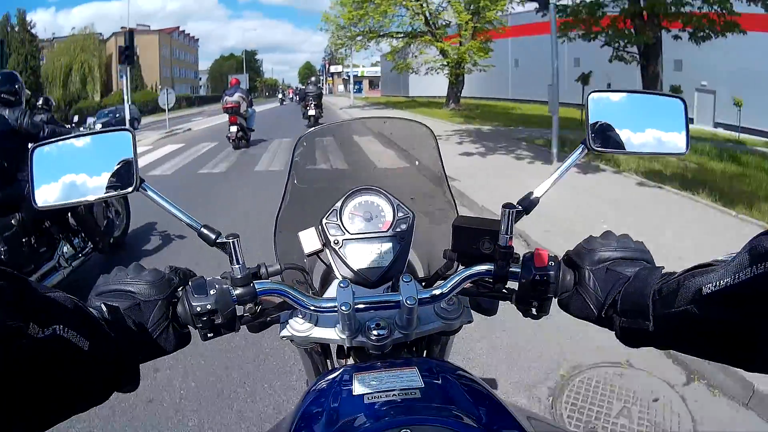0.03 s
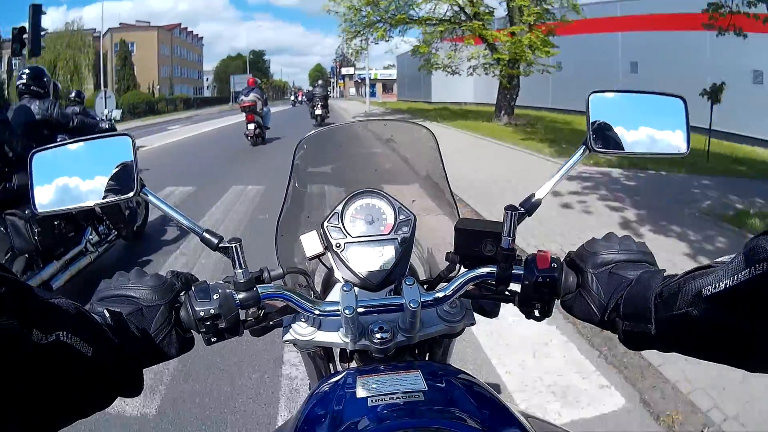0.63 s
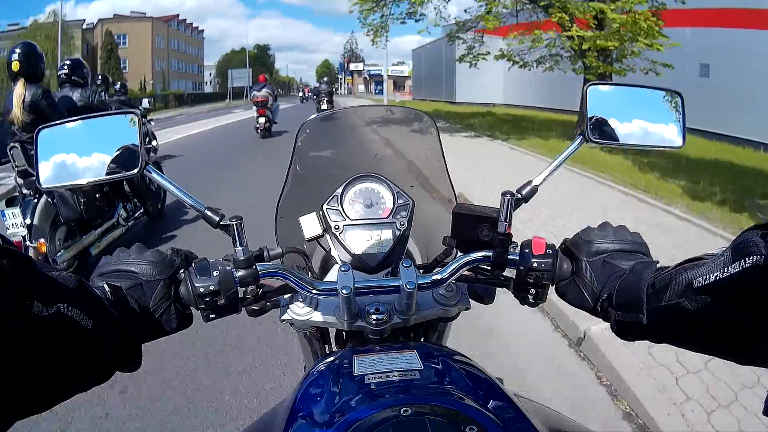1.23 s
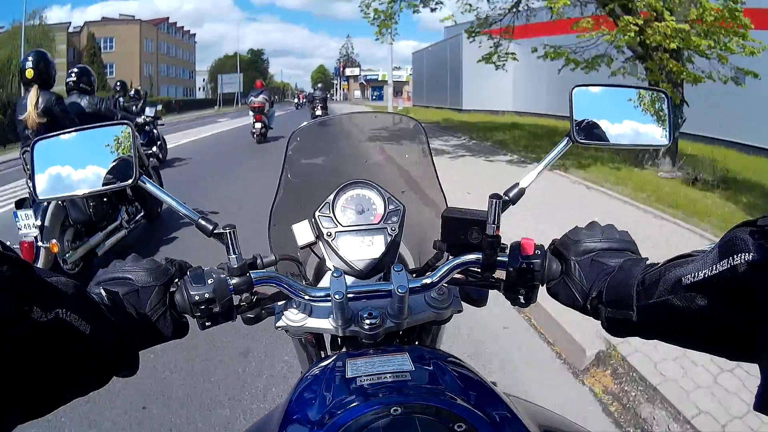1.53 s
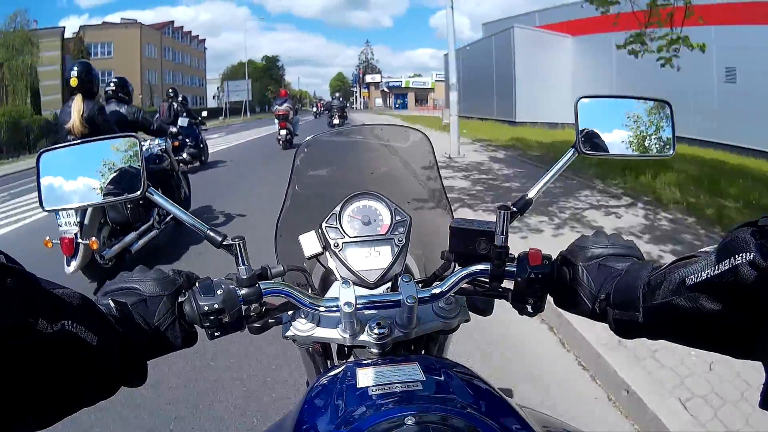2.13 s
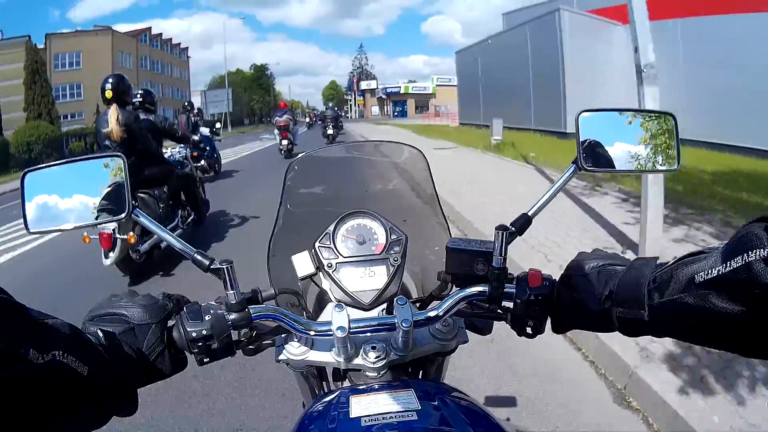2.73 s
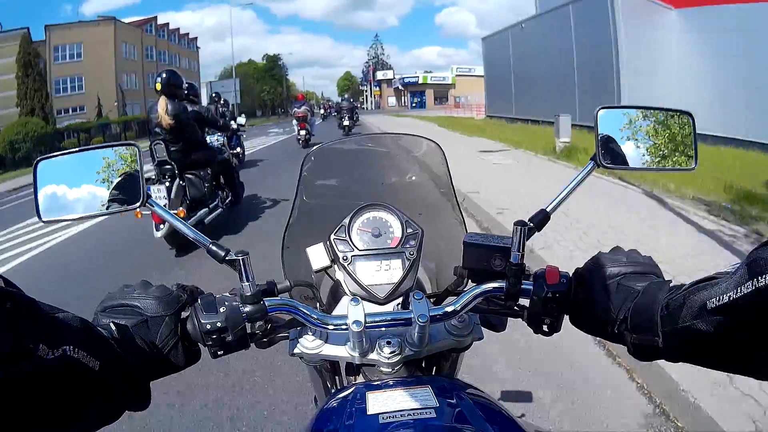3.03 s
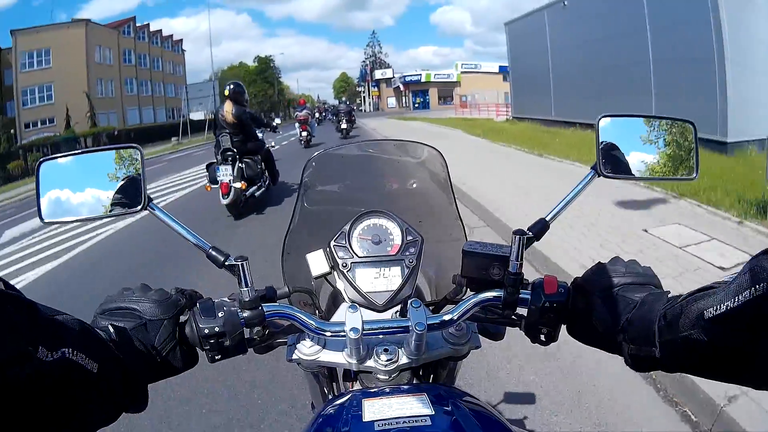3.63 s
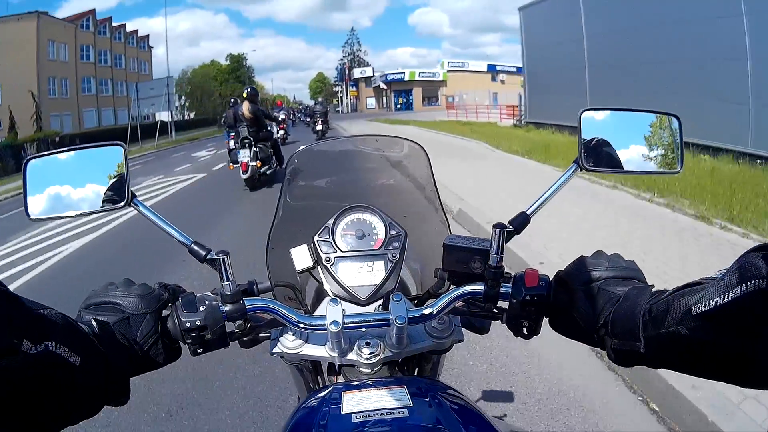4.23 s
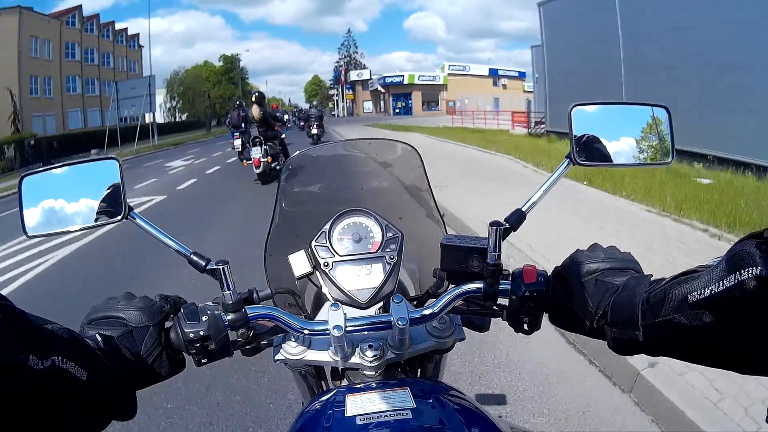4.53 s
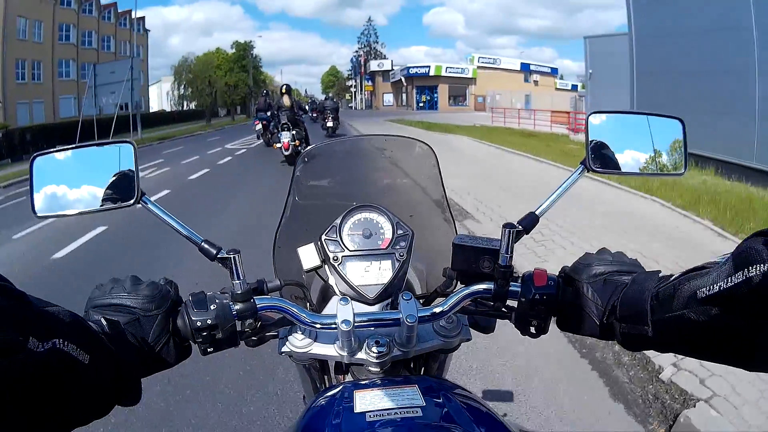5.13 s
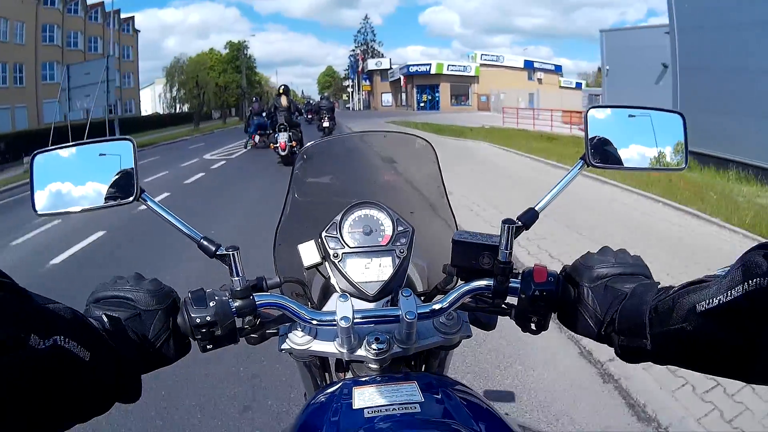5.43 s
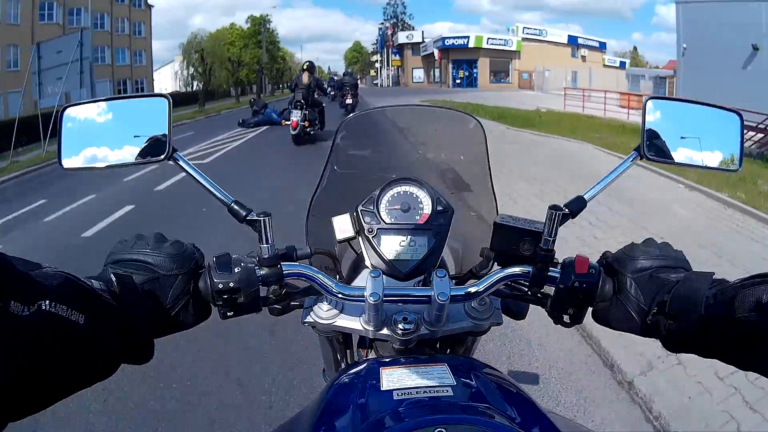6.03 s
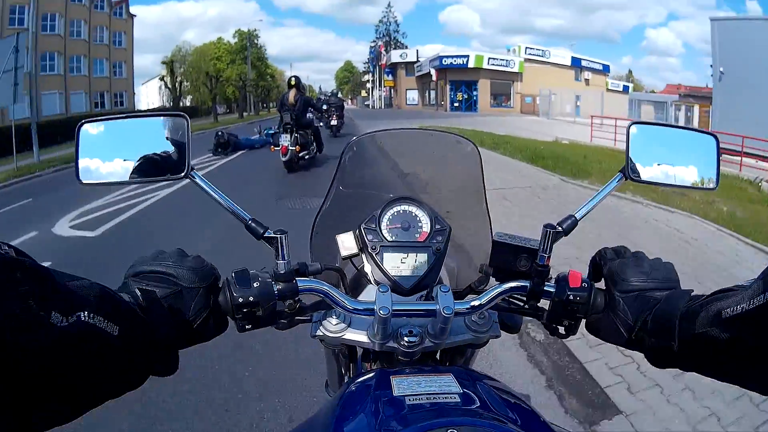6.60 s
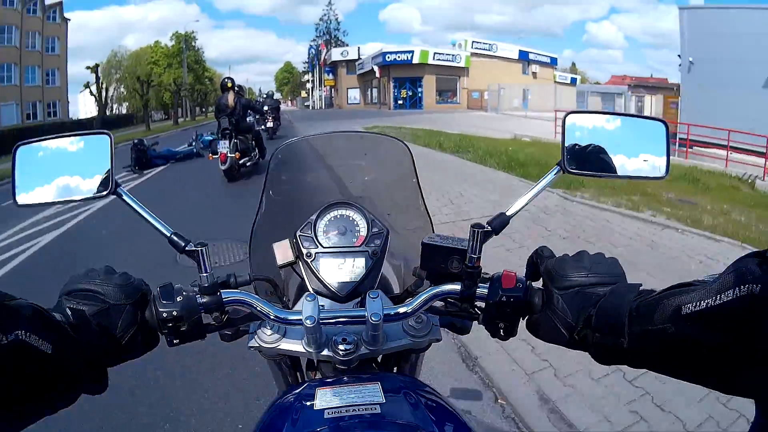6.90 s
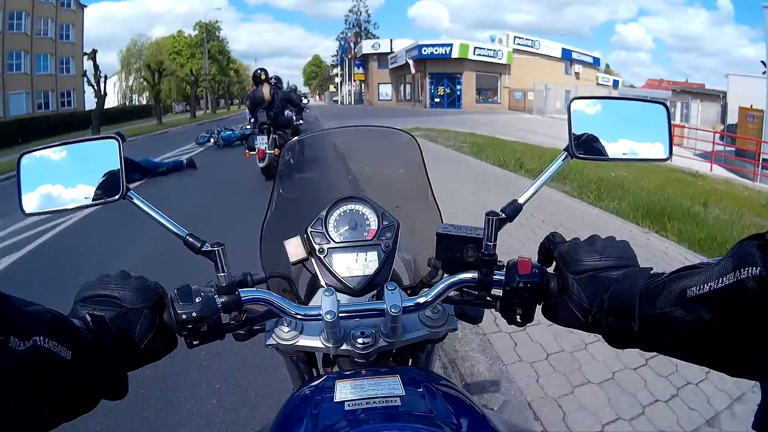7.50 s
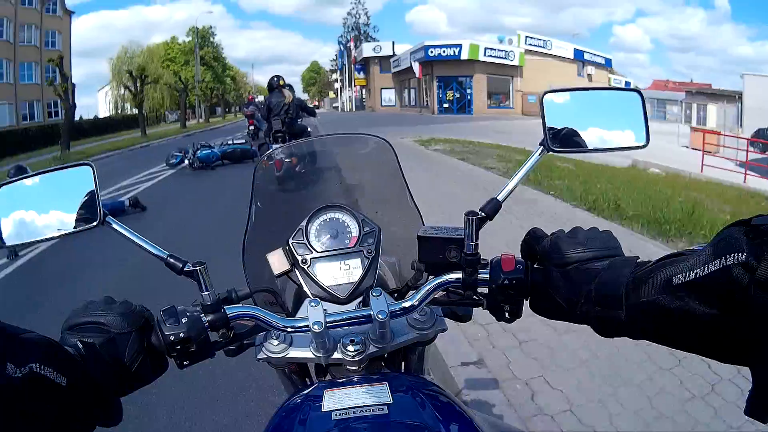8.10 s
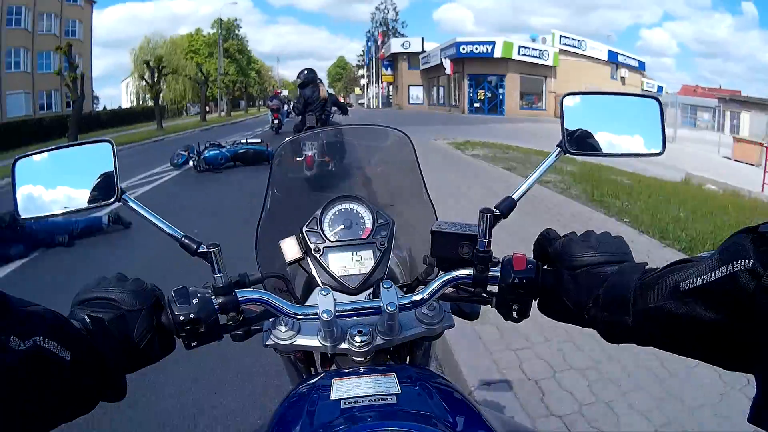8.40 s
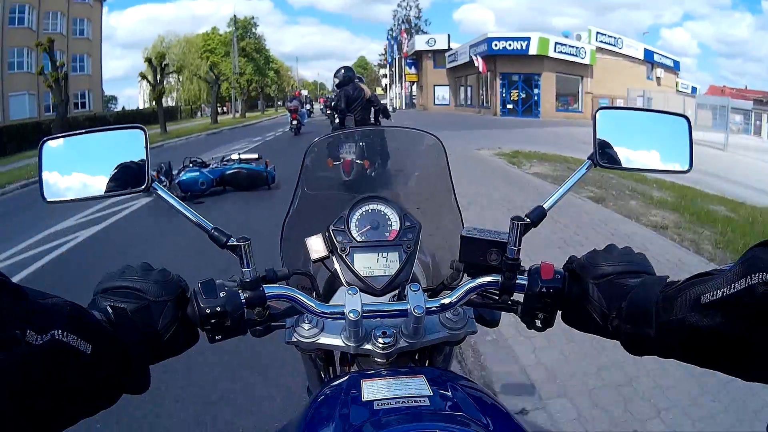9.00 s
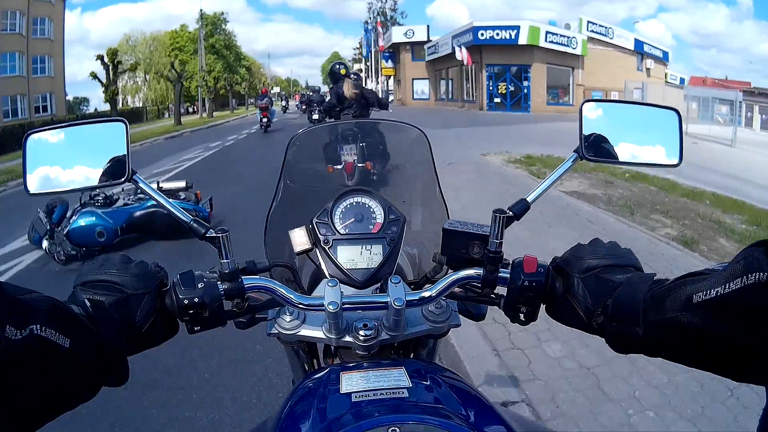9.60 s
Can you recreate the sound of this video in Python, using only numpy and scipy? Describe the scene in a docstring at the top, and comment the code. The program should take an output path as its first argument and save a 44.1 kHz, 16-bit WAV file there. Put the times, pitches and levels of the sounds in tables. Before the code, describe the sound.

A motorcycle rumbles along in wind among other bikes; one crashes and slides ahead, then a brake howls briefly.

```python
"""A V-twin cruiser rides in a convoy along a town street, heard from the rider's seat.
Its firing pulses excite the exhaust pipe's resonances, its valves tick and its gears whine under load.
A second twin overtakes and others pull away ahead, over the turbulent roar of wind and tyres.
Up the road a bike goes down: impacts ring its panels, and sliding friction scrapes it along the asphalt.
A brake howls briefly by stick-slip, the gearbox clacks and bumps knock the forks."""
import sys
import numpy as np
from scipy import signal
from scipy.fft import rfft, irfft, next_fast_len
from scipy.io import wavfile
from scipy.ndimage import uniform_filter1d, map_coordinates

SR = 44100
rng = np.random.default_rng(int(sys.argv[2]) if len(sys.argv) > 2 else 0)


def generate_wav(sig):
    """Save sig (samples, or channels by samples) to the path in sys.argv[1] as 16-bit PCM at SR."""
    pcm = np.round(np.clip(np.atleast_2d(sig).T, -1, 1) * 32767).astype(np.int16)
    wavfile.write(sys.argv[1], SR, pcm)


N = 429975
TIME = np.arange(N) / SR
TAP_SCATTER_DB = 2.1   # spread of a mode's strength from one tap to the next

# where the cruiser's two cylinders fire in the four-stroke cycle (phase/cycles)
FIRING_PHASES = [.235, .82]
# exhaust pipe modes of both twins (f/Hz, bandwidth/Hz, relative level/dB)
TWIN_PIPE_MODES = [(125, 67, 0), (250, 101, 0), (312, 110, -5.5), (567, 54, -16.5)]
# spectrum of rushing air and tyres, also of rattles and scuffs (f/Hz, relative level/dB)
RUSH_SPECTRUM = [(500, -0.5), (1000, 8), (1500, 2.5), (2100, 2), (2500, -8.5), (3000, -15), (3400, -24.5),
                 (4400, -16), (5300, -24), (5900, -34.5), (6600, -31.5), (7500, -41.5), (12500, -38.5),
                 (16000, -45)]
# spectrum of a hard, brittle impact (f/Hz, relative level/dB)
CRACK_SPECTRUM = [(600, 0.5), (2000, 7), (3300, -2.5), (5000, 3), (6000, -10), (6700, 3.5), (7400, -14.5),
                  (9200, -9), (11500, -13.5), (12800, -5), (13700, -26), (16000, -37)]


def cruiser():
    """Harmonics of one rotation: exhaust, valves and gear whine are all locked to the crankshaft."""
    # rate of the four-stroke cycle (t/s, f/Hz)
    cycle_rate = [(0, 17.63), (.45, 18.11), (1.05, 18.62), (1.65, 19.21), (2.25, 20), (2.85, 20.68),
                  (3.4, 21.51), (3.6, 21.4), (4.2, 19), (5.4, 16.5), (6.6, 10), (9.75, 10.1)]
    speed, = in_time(cycle_rate)
    cycles = np.cumsum(speed) / SR
    above_idle_hz = speed - 10
    beat = cruiser_exhaust(cycles, above_idle_hz)
    valve_clicks = firings(cycles, FIRING_PHASES, uneven_db=1.0)
    ticks = valve_ticks(cycles, above_idle_hz)
    return beat + ticks + cooling_fins(valve_clicks) + gear_whine(cycles) + whistle()


def cruiser_exhaust(cycles, above_idle_hz):
    """A periodic pulse train has a line spectrum; its level rises with speed and dips briefly as the clutch is
    pulled in."""
    # low exhaust tones (harmonic of the cycle rate, relative level/dB)
    harmonics = [(5, -4), (7, -4), (11, -10.5), (13, -12)]
    clutch_dip_db = 10.5 * swell(5.6, width_s=0.74)
    db = -30 + 0.16 * above_idle_hz - clutch_dip_db
    boom = sum(tone(round(k) * cycles, db + order_db, waver_db=-3.5) for k, order_db in harmonics)
    return boom + from_db(db) * exhaust(cycles, FIRING_PHASES, TWIN_PIPE_MODES, rough=0.15, muffler_hz=910)


def valve_ticks(cycles, above_idle_hz):
    """Impact excitation: valves ring each cylinder head, harder with speed and throttle."""
    # the front head knocks, the rear one ticks (f/Hz, stage bandwidth/Hz, front gain/dB, rear gain/dB)
    head_modes = [(2100, 650, 1, -8), (2830, 700, -13, -3.5), (4400, 900, -8.5, -8), (5100, 450, -17, -15),
                  (6900, 550, -27, -26), (9100, 800, -21, -19.5), (10700, 1000, -26, -24),
                  (12600, 800, -26, -24)]
    # throttle (t/s, opening from 0 to 1)
    throttle_curve = [(.6, 0.8), (1.2, 0.9), (2.65, 0.93), (3.05, 0.68), (3.25, 0)]
    heads = 0
    for cylinder, phase in enumerate(FIRING_PHASES):
        clicks = firings(cycles, [phase], uneven_db=1.0)
        taps = puffs(clicks, length_s=0.0024) + 0.51 * puffs(clicks, length_s=0.0047)   # tap and tail
        for k, (hz, width, *db) in enumerate(head_modes):
            strength = from_db(db[cylinder] + TAP_SCATTER_DB * drift(40))
            heads = heads + (-1) ** k * strength * resonate_twice(taps, [(hz, width, 0)])
    throttle, = in_time(throttle_curve)
    return from_db(-97 + 2.0 * above_idle_hz + 30 * throttle) * level_out(heads)


def cooling_fins(valve_clicks):
    """Sympathetic vibration: the fins ring with the valves at high revs."""
    # fin modes (f/Hz, bandwidth/Hz, relative level/dB)
    fin_modes = [(4800, 200, 4), (9100, 200, 0.5), (11200, 220, 1), (12700, 220, 2.5)]
    # spells of ringing (start/s, end/s, level/dB, attack/s, release/s)
    ringing = [(2.3, 3.1, -72.5, 2.8, 0.61), (3.3, 3.73, -71.5, .3, .15)]
    return spells(ringing) * level_out(resonate(puffs(valve_clicks, length_s=.012), fin_modes))


def gear_whine(cycles):
    """Tooth meshing: loaded gears sound fixed multiples of the cycle rate, with phase flutter."""
    # meshes (multiple of the cycle rate, flutter/cycles, start/s, end/s, level/dB, attack/s, release/s)
    meshes = [(72.3, .15, 0, .55, -47, .3, .3), (75.6, .25, 0.6, 2.7, -46, .6, 0.9),
              (74.4, .1, 3.28, 3.5, -46.5, 0.3, .1)]
    return sum(spells([spell]) * tone(k * cycles + flutter * drift(100), 0, waver_db=2.0)
               for k, flutter, *spell in meshes)


def whistle(hz=1783):
    """Random phase modulation slightly blurs a faint, steady whistle."""
    # when it sounds (start/s, end/s, level/dB, attack/s, release/s)
    whistling = [(0.69, 1.8, -50, 0.33, .2)]
    return spells(whistling) * tone(hz * TIME + 0.25 * drift(99), 0, waver_db=1.5)


def passing_twin():
    """Uneven firing intervals make an overtaking twin throb; its timbre shifts as the throttle shuts."""
    # rate of its four-stroke cycle (t/s, f/Hz)
    cycle_rate = [(0, 24.8), (.7, 25.5), (1.1, 24.9), (2.25, 27.6), (3, 24.4), (3.85, 22), (4.4, 21.6),
                  (5.35, 18.7), (5.7, 19.5), (6.0, 22.8), (6.25, 20.7), (6.5, 15.8)]
    # exhaust tones (harmonic of the cycle rate, relative level/dB on throttle, the same coasting)
    harmonics = [(2, -1, -11.5), (3, -5, -2.5), (4, -21, -14), (5, -6, -4)]
    # the throttle closes (start/s, end/s)
    closing = [2.15, 2.4]
    # it draws level, coasts past, runs on, blips and idles (start/s, end/s, gain/dB, attack/s, release/s)
    runs = [(0, 2.1, -22, 0.38, .6), (2.4, 3.65, -19, 0.6, 1.4), (4.8, 5.33, -21, 1.8, 0.28),
            (5.97, 6.25, -18, 0.48, 0.7), (6.9, 10.1, -33, .3, 0.31)]
    speed, = in_time(cycle_rate)
    cycles = np.cumsum(speed) / SR + 0.022 * drift(11)
    coasting = np.interp(TIME, closing, [0, 1])
    throb_db = 0.45 * drift(25)
    boom = sum(tone(round(k) * cycles, throb_db + on_db + coasting * (off_db - on_db), waver_db=2.0)
               for k, on_db, off_db in harmonics)
    beat = from_db(-11) * exhaust(cycles, [0, .39], TWIN_PIPE_MODES, rough=.15, muffler_hz=806)
    return spells(runs) * (boom + beat)


def bike_ahead():
    """Source and filter: open pipes bark, and rising harmonics swell as they cross the resonances."""
    # pipe modes rung by the pulses (f/Hz, bandwidth/Hz, relative level/dB)
    pipe_modes = [(126, 52, 6), (292, 67, -1), (320, 58, -12.5), (510, 120, -9.5), (640, 150, -9)]
    # exhaust tones (harmonic of the cycle rate, relative level/dB)
    harmonics = [(4, 1), (8, 0), (12, -1.5), (16, -3.5)]
    # the pipe's response to those tones (f/Hz, gain/dB)
    pipe_response = [(100, -9), (140, -4), (200, -11), (250, -1.5), (295, .5), (320, -4.5), (345, -.5),
                     (385, -4.5), (425, -5), (490, -2), (540, -8), (610, -4), (660, -6)]
    speed, gain, bright_db = through_the_gears()
    cycles = np.cumsum(speed) / SR
    bark = from_db(0.5) * exhaust(cycles, [0], pipe_modes, rough=0.32, muffler_hz=730)
    for k, order_db in harmonics:
        pipe_db = np.interp(k * speed, *np.transpose(pipe_response))
        tilt_db = bright_db * np.clip(np.log2(k / 8), 0, .6)   # throttle colours the upper tones
        ragged_phase = round(k) * cycles + .07 * drift(36)
        bark = bark + tone(ragged_phase, order_db - 2 + pipe_db + tilt_db, waver_db=1.5)
    return gain * bark


def through_the_gears():
    """Stepped gear ratios: revs climb in each pull and drop for the shift; gives rate, gain and tilt."""
    # gears and blips (start/s, end/s, first f/Hz, last f/Hz, first gain/dB, swell/dB, tilt/(dB/octave))
    pulls = [(0, 2.08, 27, 31.2, -28, 3, 3), (3.95, 4.3, 27.5, 29, -30, 0, 6),
             (4.56, 4.85, 27.5, 36, -30, 0, 7), (5.201, 5.9, 24.4, 34, -29.5, 2, -5.5),
             (6.6, 7.2, 25.2, 32, -25, 0, -1), (7.97, 8.88, 26.7, 36, -24.5, 0, -11),
             (9.02, 9.19, 27.5, 28, -25, 1, -14), (9.22, 9.8, 28, 35, -27.5, 5.5, -1)]
    bow = .2   # the revs climb fastest early in a gear
    gain = from_db(-37.5)   # coasting floor
    course = []
    for start, end, low, high, db, swell_db, bright_db in pulls:
        for u in np.linspace(0, 1, 10):
            climb = u + bow * u * (1 - u)
            course.append((start + u * (end - start), low + (high - low) * climb, bright_db))
        level = from_db(db + swell_db * np.interp(TIME, [start, end], [0, 1]))
        gain = np.maximum(gain, level * held(start, end, attack_s=.25, release_s=.25))
    speed, bright_db = in_time(course)
    return speed, gain, bright_db


def far_bike():
    """Swept resonance: a smoother, distant engine winds up, its tones crossing the pipe's peaks in turn."""
    # rate of its cycle (t/s, f/Hz)
    cycle_rate = [(8.2, 32), (8.75, 39.2), (9.05, 40.3)]
    # exhaust tones (harmonic of the cycle rate)
    harmonics = [8, 12, 15]
    # the pipe's response (f/Hz, gain/dB)
    pipe_response = [(235, 1), (295, 2), (320, -8), (390, -16), (430, -7), (480, -3), (540, -12), (605, -1)]
    # when it is heard (start/s, end/s, gain/dB, attack/s, release/s)
    run = [(8.45, 9.15, -30, .3, .2)]
    speed, = in_time(cycle_rate)
    cycles = np.cumsum(speed) / SR
    tones = 0
    for k in harmonics:
        pipe_db = np.interp(k * speed, *np.transpose(pipe_response))
        tones = tones + tone(k * cycles + 0.1 * drift(30), pipe_db, waver_db=-3.5)
    return spells(run) * tones


def crash():
    """Impact and friction: a fallen bike strikes the road and slides; grit roughens scrapes and cracks."""
    grit_db = 2.5 * np.minimum(rng.exponential(1, N // 30 + 1), 3).repeat(30)[:N]
    grit = rng.standard_normal(N) * from_db(grit_db)
    return scraping(grit) + crunching_panels() + sizzling_metal() + crash_blows(grit[::-1])


def scraping(grit):
    """Sliding friction on a rough surface gives broadband noise; the dragging weight adds a rumble."""
    # grinding between bounces (start/s, end/s, level/dB, attack/s, release/s)
    scrapes = [(5.43, 5.48, -51, .08, 0.11), (5.53, 5.6, -43, 0.098, 0.13), (5.69, 5.72, -50, 0.07, .2),
               (5.96, 6.04, -47, 0.31, 0.47), (6.2, 6.45, -56.5, 0.5, 1.5)]
    # its spectrum (f/Hz, relative level/dB)
    scrape_spectrum = [(500, 0), (1200, 15), (2200, 6.5), (3200, -9), (4500, -2.5), (5500, -5), (6000, -18),
                       (6700, -13), (7400, -21.5), (9500, -17.5), (11000, -27.5), (13000, -19),
                       (15000, -36)]
    # the weight drags (start/s, end/s, level/dB, attack/s, release/s)
    drags = [(5.5, 5.64, -21.5, 0.39, 0.59), (5.8, 6.15, -26, .2, 0.33)]
    # its dull spectrum (f/Hz, relative level/dB)
    drag_spectrum = [(120, 3.5), (320, 1), (620, 2), (1000, -13), (1400, -23), (2100, -26), (2800, -42.5)]
    return spells(scrapes) * colour(grit, scrape_spectrum) + spells(drags) * noise(drag_spectrum)


def crunching_panels():
    """Random impulse excitation: panels crunch under the bike and ring its frame."""
    # crunches (start/s, end/s, level/dB, attack/s, release/s)
    crunches = [(5.53, 5.595, -39, .12, .1), (5.685, 5.72, -40, .02, .12), (5.93, 6.05, -44, .15, .3)]
    # frame modes (f/Hz, bandwidth/Hz, relative level/dB)
    frame_modes = [(1700, 300, 4), (2060, 220, 4), (3200, 220, -8), (4150, 220, -13), (5350, 200, -13),
                   (6700, 150, -21), (7900, 150, -23)]
    crackle = puffs(grains(per_s=1500, spread_db=0.0), length_s=0.0016)
    return spells(crunches) * resonate(crackle, frame_modes)


def sizzling_metal():
    """Shot noise: dense, tiny contacts excite the high modes of bare sliding metal."""
    # slides (start/s, end/s, level/dB, attack/s, release/s)
    slides = [(6.0, 6.8, -69, .2, 0.61), (7.12, 7.28, -68.5, 0.23, .25)]
    # modes of the metal (f/Hz, bandwidth/Hz, relative level/dB)
    metal_modes = [(4280, 250, 1), (4700, 250, 2.5), (5400, 180, -0.5), (6500, 210, -5.5),
                   (7900, 220, -10.5), (9200, 700, -10), (12600, 600, -12)]
    gain = spells(slides) * from_db(1.5 * drift(14))
    return gain * resonate(grains(per_s=2300, spread_db=4.5), metal_modes)


def crash_blows(grit):
    """Damped vibration: each blow on the asphalt gives a bright crack and a dying knock of the bodywork."""
    # blows (t/s, crack level/dB, crack T60/s, knock level/dB)
    blows = [(5.355, -60, .08, -26), (5.424, -58, 0.06, -25), (5.435, -56, .08, -22),
             (5.567, -47.5, .13, -22), (5.652, -58, .05, -24), (5.679, -39.5, 0.15, -21.5),
             (5.716, -50, .07, -31)]
    # modes of fairing and tank (f/Hz, bandwidth/Hz, relative level/dB)
    body_modes = [(583, 54, 12.5), (825, 320, 3), (1190, 330, -5.5), (1990, 290, -10)]
    cracks = sum(from_db(db) * dying(s, t60) for s, db, t60, _ in blows)
    knocks = sum(from_db(db) * dying(s, t60=0.15) for s, _, _, db in blows)
    body = low_pass(knocks * resonate(rng.standard_normal(N), body_modes), 2050, order=4)
    return cracks * colour(grit, CRACK_SPECTRUM) + body


def brake_howl():
    """Stick-slip oscillation: the pads grab in one unsteady howl that rises as the wheel stops."""
    # pitch of the howl (t/s, f/Hz)
    pitch = [(7.0, 560), (7.37, 550), (7.52, 568), (7.65, 574), (7.71, 610), (7.79, 648)]
    # grabs of the pads (t/s, half width/s, level/dB)
    grabs = [(7.1, .035, -29), (7.3, 0.04, -24.5), (7.455, 0.04, -19), (7.527, 0.035, -15),
             (7.62, 0.055, -22.5), (7.712, 0.015, -21), (7.78, 0.02, -22.5)]
    hz, = in_time(pitch)
    gain = sum(from_db(db) * swell(s, width) for s, width, db in grabs)
    return gain * tone(np.cumsum(hz) / SR + 0.08 * drift(55), 0, waver_db=1.0)


def brake_rub():
    """Friction noise drives narrow resonances: discs sing, a pad squeaks, a groan precedes the howl."""
    # firm pressure on the discs (start/s, end/s, level/dB, attack/s, release/s)
    braking = [(6.0, 7.37, -51.5, .2, 0.46)]
    # disc modes (f/Hz, bandwidth/Hz, relative level/dB)
    disc_modes = [(1470, 110, 3), (2036, 74, 7.5), (3130, 91, -7), (4200, 210, -13), (5430, 190, -19),
                  (6490, 99, -21.5)]
    # a pad drags (start/s, end/s, level/dB, attack/s, release/s)
    pad_drag = [(2.99, 3.17, -72, 0.33, .05), (3.32, 3.48, -75, 0.058, 0.066)]
    # its thin resonance (f/Hz, stage bandwidth/Hz, relative level/dB)
    squeak_mode = [(6500, 70, 0)]
    # the brake groans (start/s, end/s, level/dB, attack/s, release/s)
    groaning = [(6.5, 7.65, -30.5, 0.3, 0.3)]
    # its low resonance (f/Hz, stage bandwidth/Hz, relative level/dB)
    groan_mode = [(551.7, 57, 0)]
    singing = spells(braking) * from_db(3.4 * drift(16)) * resonate(rng.standard_normal(N), disc_modes)
    squeak = spells(pad_drag) * resonate_twice(rng.standard_normal(N), squeak_mode)
    groan = spells(groaning) * resonate_twice(rng.standard_normal(N), groan_mode)
    return singing + squeak + groan


def gearbox():
    """Modal ringing: dogs and lever strike the casing on downshifts; sharper contact sounds brighter."""
    # clacks (t/s, level/dB, contact cutoff f/Hz)
    clacks = [(7.152, -49, 2400), (7.467, -50, 3000), (7.523, -47.5, 7000), (7.570, -50, 6000),
              (9.125, -47, 3000), (9.168, -46, 5500), (9.197, -50, 5000), (9.251, -47.5, 6000),
              (9.301, -52, 3400)]
    # casing modes (f/Hz, bandwidth/Hz, relative level/dB)
    casing_modes = [(670, 75, 24), (1300, 500, 6), (1970, 260, 15), (3000, 250, 2), (4200, 130, 10),
                    (4750, 200, -5), (6450, 370, -15)]
    # a soft scuff between shifts (start/s, end/s, level/dB, attack/s, release/s)
    scuff = [(7.91, 7.95, -46.5, 0.048, 0.046)]
    shifts, age = np.zeros(N), np.arange(SR // 10) / SR
    for s, db, contact_hz in clacks:
        blow = rng.standard_normal(len(age)) * (np.exp(-age / .0022) + .1 * np.exp(-age / .014))
        casing = [(hz, width, mode_db + TAP_SCATTER_DB * rng.standard_normal())
                  for hz, width, mode_db in casing_modes]
        at = round(s * SR)
        shifts[at:at + len(age)] += from_db(db) * resonate(low_pass(blow, contact_hz), casing)
    return shifts + spells(scuff) * noise(RUSH_SPECTRUM)


def bumps():
    """Shock excitation: each bump thuds, knocks the forks and makes loose fittings rattle and snap."""
    # road bumps (t/s, thud level/dB, knock level/dB, rattle level/dB)
    jolts = [(0.778, -23, -18, -32), (0.829, -19, -19.5, -32.5), (1.939, -17, -15, -28.5),
             (2.028, -21, -10.5, -40), (2.198, -25, -21, -49), (3.348, -11, -27, -57),
             (3.512, -3, -15, -34), (3.527, -29, -36, -32.5), (4.15, -30, -21, -52)]
    # fork modes (f/Hz, relative level/dB, nominal T60/s)
    fork_modes = [(337, -11.5, 0.23), (477, 1, 0.074), (651, 6.5, 0.031), (890, -10, 0.0064)]
    # fittings hit their stops (t/s, level/dB)
    snaps = [(2.031, -46), (2.036, -43), (3.516, -49), (3.522, -48)]
    thud = sum(from_db(db) * dying(s, t60=0.15) * np.sin(2 * np.pi * 31 * (TIME - s))
               for s, db, _, _ in jolts)
    knock = sum(from_db(db) * dying(s, t60=0.17) for s, _, db, _ in jolts)
    rattle = sum(from_db(db) * dying(s, t60=0.16) for s, _, _, db in jolts)
    snap = sum(from_db(db) * dying(s, t60=0.015) for s, db in snaps)
    forks = resonate(rng.standard_normal(N), [(hz, 2.5 / t60, db) for hz, db, t60 in fork_modes])
    fittings = low_pass(rattle * noise(RUSH_SPECTRUM), 4400) + snap * noise(CRACK_SPECTRUM)
    return low_pass(thud + knock * forks, 1000, order=4) + fittings


def wind_and_road():
    """Turbulence and rolling noise: gusts thump over a dull roar and a rush that fall as the bikes slow."""
    # rush of air and tyres (t/s, level/dB)
    rush_levels = [(0, -35), (1.05, -40), (2.15, -37), (3.2, -42.5), (5.1, -47), (6.6, -45.5), (7.7, -49),
                   (9.75, -50)]
    # gusts at the listener (t/s, half width/s, level/dB)
    gust_peaks = [(.8, 0.073, -19), (1.42, 0.11, -19.5), (2.01, 0.076, -14), (5.0, 0.35, -24),
                  (5.82, 0.28, -22.5)]
    # spectrum of the buffeting (f/Hz, relative level/dB)
    buffet_spectrum = [(10, -20.5), (22, -11.5), (34, -2), (50, -2.5), (90, -12), (200, -41)]
    # spectrum of the roar (f/Hz, relative level/dB)
    roar_spectrum = [(30, -28), (50, -3.5), (110, 9.5), (170, -1.5), (320, 0), (430, -3), (620, -5.5),
                     (800, -13), (1000, -19), (1300, -37.5), (2500, -52)]
    rush_db, = in_time(rush_levels)
    swing_db = rush_db + 45   # relative to cruising; buffet and roar follow a share of it
    gusts = sum(from_db(db) * swell(s, width) for s, width, db in gust_peaks)
    buffet = np.hypot(from_db(-30 + 0.51 * np.minimum(swing_db, 0)), gusts) * noise(buffet_spectrum)
    roar = from_db(-21 + 0.65 * swing_db + 1.1 * drift(22)) * noise(roar_spectrum)
    rush = from_db(rush_db) * noise(RUSH_SPECTRUM)
    hiss = from_db(-71.5) * noise([(3000, -4.0), (15000, -4.5)])
    return buffet + roar + rush + hiss


def exhaust(cycles, phases, pipe, rough, muffler_hz):
    """Pipe resonance: firing pulses and turbulent gas ring the pipe; the muffler is a low-pass filter."""
    clicks = firings(cycles, phases, uneven_db=0.0)
    ringing = resonate(clicks + rough * puffs(clicks, length_s=0.0033), pipe)
    return level_out(low_pass(ringing, muffler_hz, order=4))


def firings(cycles, phases, uneven_db):
    """Impulse train: one click each time the engine cycle passes a cylinder's phase."""
    clicks = np.zeros(N)
    for phase in phases:
        at = np.flatnonzero(np.diff(np.floor(cycles - phase)) > 0)
        clicks[at] += from_db(uneven_db * rng.standard_normal(600)[:len(at)])
    return clicks


def grains(per_s, spread_db):
    """Poisson process: random clicks, their sizes scattered by spread_db."""
    sizes = from_db(spread_db * np.minimum(rng.exponential(1, N), 4)) * rng.choice([-1, 1], N)
    return sizes * (rng.random(N) < per_s / SR)


def puffs(clicks, length_s):
    """Energy spread in time: every click becomes a decaying noise burst of the same energy."""
    r = np.exp(-1 / (length_s * SR))
    return signal.lfilter([np.sqrt(1 - r * r)], [1, -r], clicks + 1e-18) * rng.choice([-1, 1], N)


def tone(cycles, db, waver_db):
    """Amplitude modulation: a sine follows a running phase, wavering about an rms level."""
    return np.sqrt(2) * from_db(db + waver_db * drift(9)) * np.sin(2 * np.pi * (cycles + rng.random()))


def resonate(x, modes):
    """Modal superposition: parallel resonators (f/Hz, bandwidth/Hz, relative level/dB); rms 1."""
    total = 0
    for k, (hz, width, db) in enumerate(modes):
        r = np.exp(-np.pi * width / SR)
        poles = [1, -2 * r * np.cos(2 * np.pi * hz / SR), r * r]
        gain = (-1) ** k * from_db(db) * (1 - r * r) / 2
        total = total + gain * signal.lfilter([1, 0, -1], poles, x + 1e-18)
    return rms_one(total)


def resonate_twice(x, modes):
    """Two equal stages in cascade give a narrower peak with steeper skirts."""
    return resonate(resonate(x, modes), modes)


def colour(x, spectrum):
    """Spectral shaping by (f/Hz, level/dB) points, falling 12 dB per octave beyond them; rms 1."""
    hz, db = np.transpose(spectrum)
    size = next_fast_len(N + 8000)
    bins = np.maximum(np.fft.rfftfreq(size, 1 / SR), 1)
    gain = from_db(np.interp(np.log(bins), np.log(hz), db))
    skirts = np.minimum(1, bins / hz[0]) ** 2 * np.minimum(1, hz[-1] / bins) ** 2
    return rms_one(irfft(rfft(x, size) * gain * skirts, size)[:N])


def noise(spectrum):
    """Gaussian noise of a given spectrum; rms 1."""
    return colour(rng.standard_normal(N), spectrum)


def low_pass(x, hz, order=2):
    """Maximally flat low-pass filter."""
    return signal.sosfilt(signal.butter(order, min(hz, SR / 3), fs=SR, output="sos"), x + 1e-18)


def spells(rows):
    """Power addition of held gains (start/s, end/s, level/dB, attack/s, release/s)."""
    return np.sqrt(sum((from_db(db) * held(start, end, attack, release)) ** 2
                       for start, end, db, attack, release in rows))


def held(start, end, attack_s, release_s):
    """A plateau with exponential flanks; attack and release are the times for a 20 dB change."""
    decades = np.maximum(start - TIME, 0) / attack_s + np.maximum(TIME - end, 0) / release_s
    return 10.0 ** -np.minimum(decades, 10)


def dying(at, t60):
    """Exponential decay from a given moment, by 60 dB in t60 seconds."""
    age = TIME - at
    return (age >= 0) * np.exp(-np.log(1000) * np.clip(age / t60, 0, 10))


def swell(at, width_s):
    """Gaussian envelope of height 1."""
    return np.exp(-np.minimum(((TIME - at) / width_s) ** 2, 20))


def drift(rate):
    """Smooth random modulation of spread near 1, with `rate` new values a second."""
    steps = np.arange(0, N + 50, 50) / SR
    curve = map_coordinates(rng.standard_normal(1000), [steps * rate], order=3, mode="wrap")
    return np.interp(TIME, steps, curve)


def in_time(rows):
    """Linear interpolation of rows (t/s, values...): one signal for each value column."""
    s, *columns = np.transpose(rows)
    return [np.interp(TIME, s, column) for column in columns]


def level_out(x):
    """Hold the running rms at 1."""
    return x / np.sqrt(np.abs(uniform_filter1d(x * x, SR // 3)) + 1e-9)


def rms_one(x):
    """Scale the overall rms to 1."""
    return x / np.sqrt(np.mean(x ** 2) + 1e-20)


def from_db(db):
    """Amplitude ratio of a level."""
    return 10 ** (np.asarray(db) / 20)


def scene():
    """Linear superposition of all sources in one channel."""
    engines = cruiser() + passing_twin() + bike_ahead() + far_bike()
    events = crash() + brake_howl() + brake_rub() + gearbox() + bumps()
    return (engines + events + wind_and_road())[None]


def record(dry):
    """Short fades soften the ends, saturation rounds the peaks and a low-pass cuts the top."""
    fade_s, ceiling, cutoff_hz = .004, .75, 15700
    from_edge_s = np.minimum(TIME, TIME[::-1])
    faded = dry * np.sin(np.pi / 2 * np.minimum(from_edge_s / fade_s, 1)) ** 2
    rounded = faded / (1 + (faded / ceiling) ** 6) ** (1 / 6)
    return signal.sosfilt(signal.ellip(10, .1, 80, cutoff_hz, fs=SR, output="sos"), rounded)


dry = scene()
out = record(dry)
generate_wav(out)
```